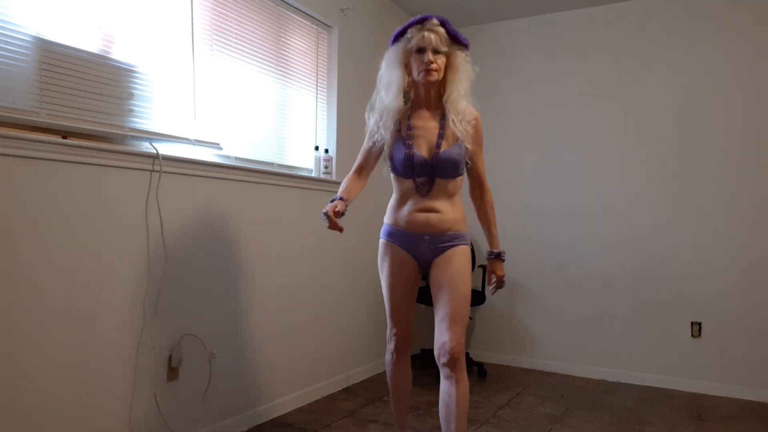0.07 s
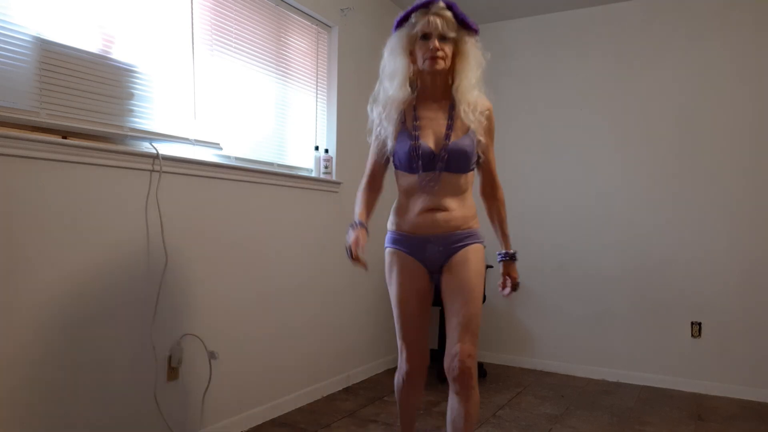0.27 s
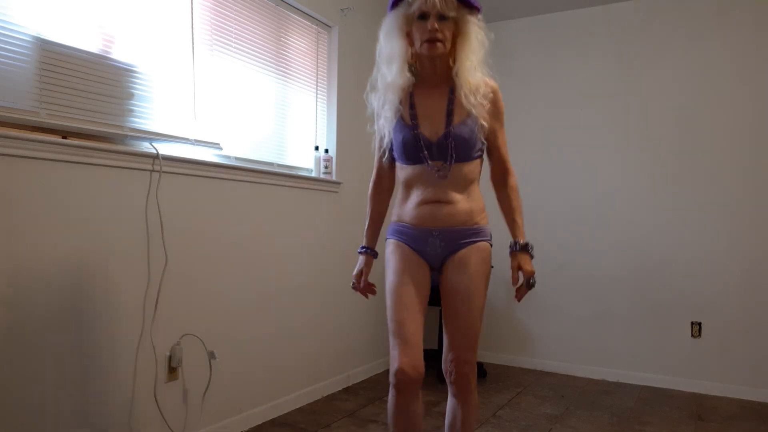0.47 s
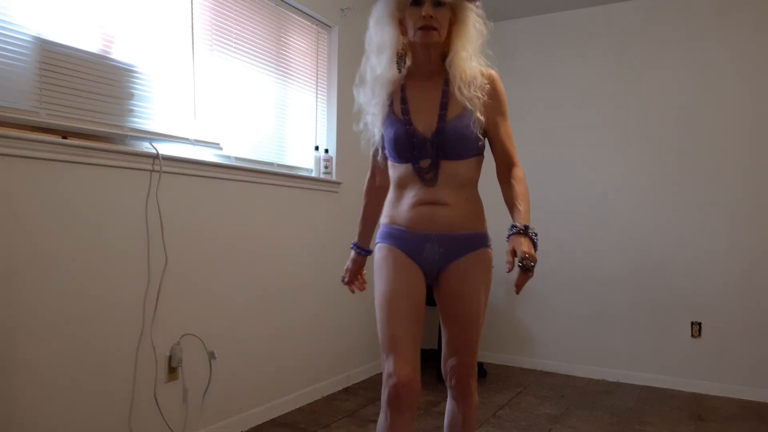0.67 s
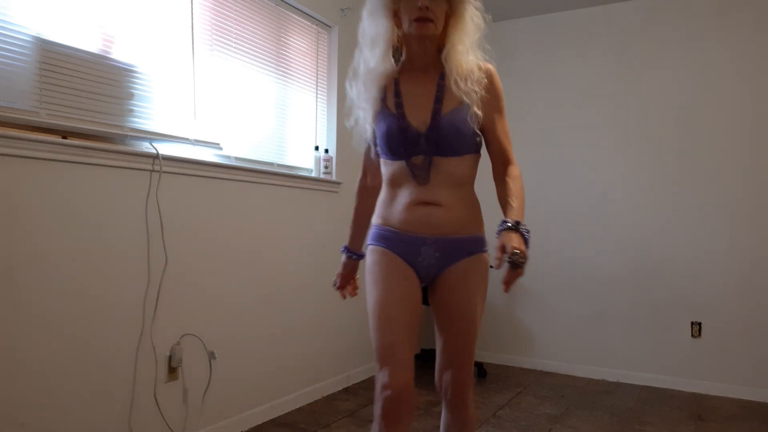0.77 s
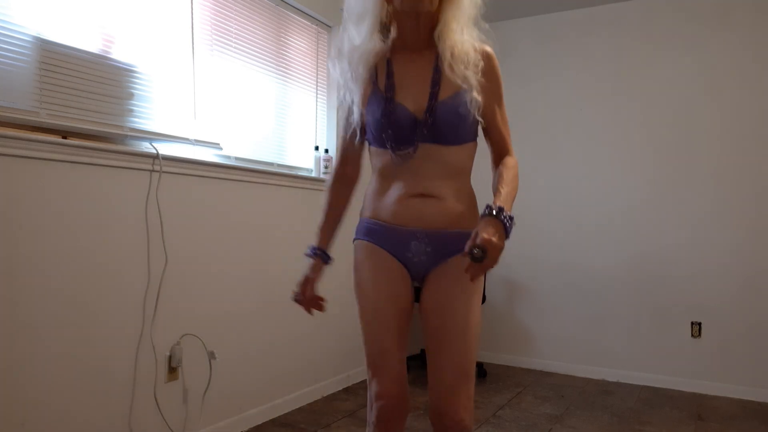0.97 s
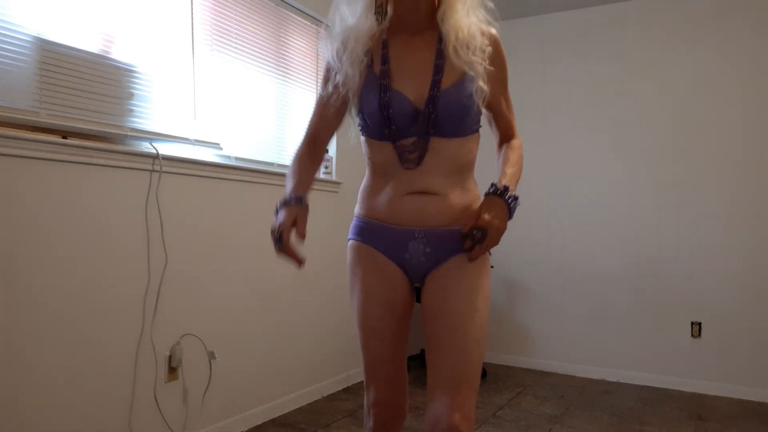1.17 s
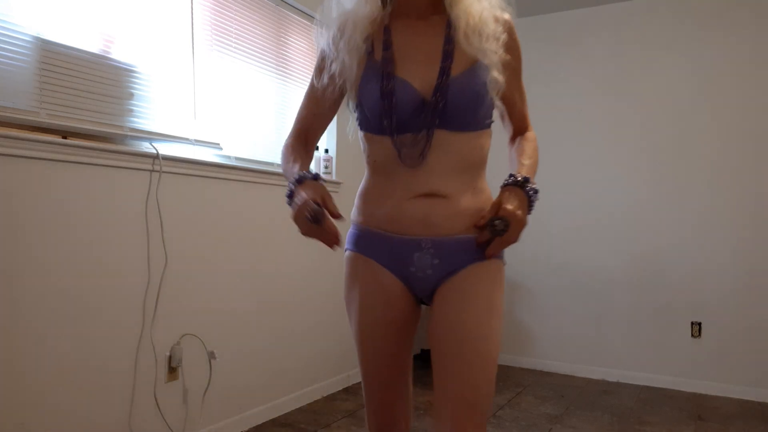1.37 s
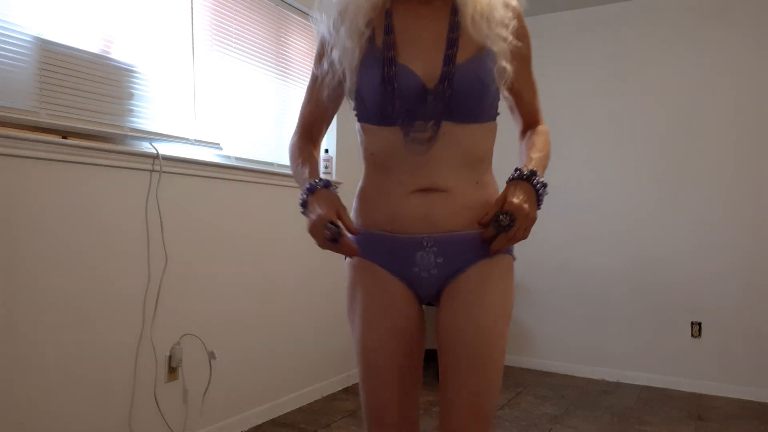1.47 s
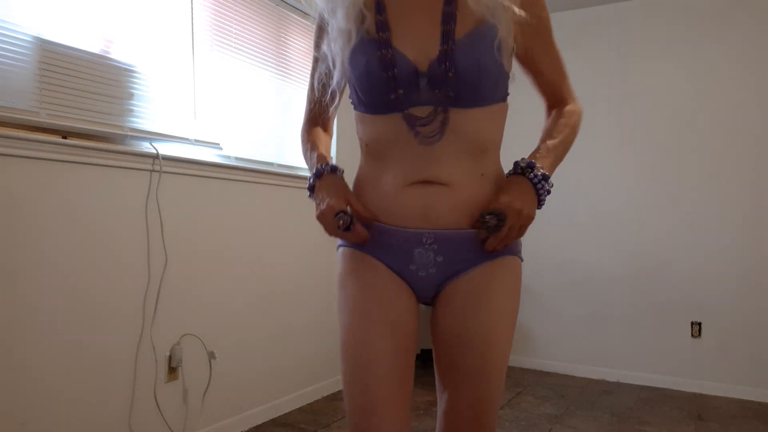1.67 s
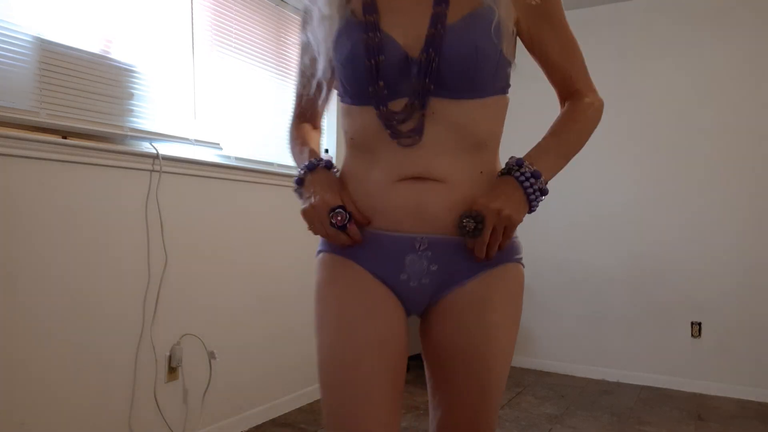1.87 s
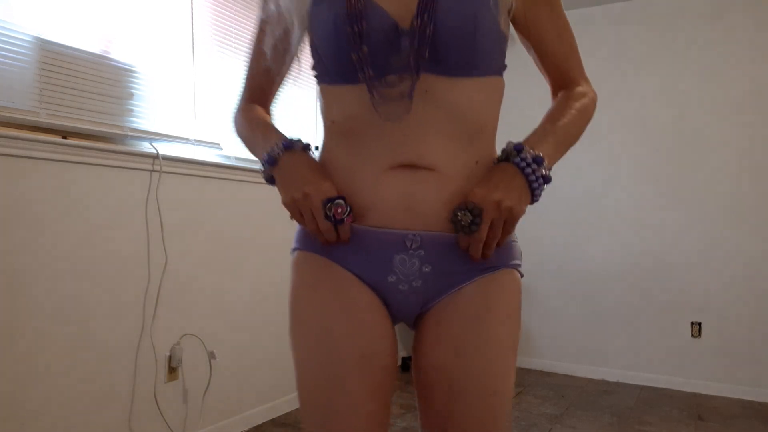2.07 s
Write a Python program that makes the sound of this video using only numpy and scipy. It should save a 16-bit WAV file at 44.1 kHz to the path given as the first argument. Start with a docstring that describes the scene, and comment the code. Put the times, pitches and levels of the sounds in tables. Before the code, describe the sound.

High-heeled shoes walk over hard tiles towards the microphone, heel and toe knocking in close pairs, with light scuffs and bead ticks; a bare room echoes each step over low hum and faint hiss.

```python
"""Someone in high heels walks towards the microphone over tiles in a bare, echoing room.
From the start heel and toe knock the floor (short bursts of ringing modes), soles scuff and beads tick
(bursts of noisy grains), and the walls smear it all (decaying noise as echoes).
Under it lie a low building hum (noise through narrow resonances) and a faint hiss (steady noise).
Later the hum swells twice on a steadier pitch."""
import sys
import numpy as np
from scipy import signal
from scipy.io import wavfile

SR = 44100
rng = np.random.default_rng(int(sys.argv[2]) if len(sys.argv) > 2 else 0)


def waveform_to_disk(signal):
    """Save audio, clipped to [-1, 1], as 16-bit WAV at the path in sys.argv[1]."""
    frames = np.transpose(np.atleast_2d(signal))
    scaled = np.clip(frames, -1, 1) * 32767
    samples = np.round(scaled).astype(np.int16)
    wavfile.write(sys.argv[1], SR, samples)


N = 92874   # length in samples
LEAD = 22050   # samples before the start, so that earlier sound is still ringing
DIRECT_DB = -17   # level of the sound that reaches the microphone without echoes
ROOM_BUILD_S = 0.012   # the echoes thicken over this time


def from_db(db):
    """Turn decibels into a factor on the wave."""
    return 10 ** (np.asarray(db) / 20)


def rms_one(x):
    """Scale a signal to an average (rms) level of 1."""
    return x / np.sqrt(np.mean(x ** 2) + 1e-20)


def at_hz(points, hz):
    """Read a curve of (f, value) points at any frequency, on a logarithmic frequency scale."""
    table = np.array(points)
    return np.interp(np.log(hz), np.log(table[:, 0]), table[:, 1])


def band(x, low_hz, high_hz):
    """Keep only the sound between two frequencies."""
    return signal.sosfilt(signal.butter(2, [low_hz, high_hz], "band", fs=SR, output="sos"), x)


def resonance(x, hz, width_hz):
    """A resonance favours one pitch; it has gain 1 at its top."""
    r = np.exp(-np.pi * width_hz / SR)
    feedback = [1, -2 * r * np.cos(2 * np.pi * hz / SR), r * r]
    return signal.lfilter(np.array([1, 0, -1]) * (1 - r * r) / 2, feedback, x)


def stereo_bands(size, count, gain):
    """Half-octave bands of stereo noise, each with its own gain and left-right likeness."""
    # how alike left and right are: (f/Hz, likeness from -1 opposite to 1 identical)
    likeness = [(60, 0.53), (130, 1), (290, 0.81), (640, 0.44), (1410, -0.4), (3100, 0.14), (6820, 0.35),
                (15000, 0.11)]
    out = 0
    edges = 28 * 2 ** np.arange(0, 9.6, .5)
    white = rng.standard_normal((2, 2, count, size))
    for k, (low, high) in enumerate(zip(edges, edges[1:])):
        centre = np.sqrt(low * high)
        mid, side = band(white[k % 2], low, high)
        alike = np.clip(at_hz(likeness, centre), -1, 1)
        left = np.sqrt(1 + alike) * mid + np.sqrt(1 - alike) * side
        right = np.sqrt(1 + alike) * mid - np.sqrt(1 - alike) * side
        out = out + gain(centre) * np.array([left, right])
    return out


def ring(clicks, modes, first):
    """Clicks set decaying modes ringing, neighbours in opposite phase; a unit click carries unit energy."""
    contact_s, contact_cycles = 0.0013, 1.5   # a mode swells over this time plus some of its own cycles
    t = np.arange(SR // 10) / SR
    body = 0
    for k, (hz, db, t60) in enumerate(modes):
        rise = np.sin(np.pi / 2 * np.clip(t / (contact_s + contact_cycles / hz), 0, 1)) ** 2
        decay = from_db(db - 60 * t / t60)
        body = body + (-1) ** (first + k) * decay * np.sin(2 * np.pi * hz * t) * rise
    body = body / np.sqrt(np.sum(body ** 2))
    return signal.fftconvolve(clicks, body[None])[:, :clicks.shape[1]]


def place(s):
    """Which of four spots along the walk sounds at a time."""
    return int(np.clip((s + .1) / .58, 0, 3))


def steps():
    """Every contact strikes the shoe's mode groups at its own strengths; the last row arrives directly."""
    # heel and toe contacts: (t/s, then level/dB of each group: thump, thud, body, knock, clack, tick)
    contacts = [(-.2, -49.5, -66, -53, -52.5, -60, -74.5), (0.109, -56, -70, -56, -69, -65, -66),
                (0.128, -56, -45, -54.5, -53, -57.5, -63), (.226, -47.5, -46, -44.5, -51.5, -58.5, -61),
                (.498, -63, -58, -54, -47.5, -55, -66), (0.722, -45.5, -45, -47, -40.5, -52, -55.5),
                (.798, -52, -53, -50, -55, -59.5, -64), (1.294, -48, -48.5, -53, -60, -63, -77),
                (1.335, -69, -60, -64, -60, -64, -71), (1.37, -58.5, -50, -51, -57.5, -66, -68.5),
                (1.44, -59.5, -78, -64.5, -67, -90, -103), (1.874, -56, -55, -74, -56.5, -65, -94),
                (1.882, -55.5, -52.5, -56, -51, -59.5, -70.5), (1.96, -57.5, -62.5, -59, -55, -62, -63)]
    # modes of the shoe on the tile, in groups from low to high: (f/Hz, level/dB, time to fall 60 dB/s)
    shoe_modes = [
        [(116.5, -5.5, 0.061), (185.8, 3, .035), (273, -1, 0.022)],
        [(369.4, -1, 0.023), (473.2, -5, 0.032)],
        [(624.5, 0.5, 0.015), (832, 3.5, 0.0075)],
        [(943, 5.5, .016), (1105, 1, 0.013)],
        [(1465, 0, 0.0061)],
        [(1994, -2.5, 0.0063), (2543, -2, 0.004)],
    ]
    toe_direct_db = 4.5   # the toe slap, soon after another contact, carries more directly
    heel_direct_db = -1.5   # other contacts arrive mostly by way of floor and walls
    clicks = np.zeros((len(shoe_modes), 5, LEAD + N))   # four spots, then the direct row
    last = -1
    for s, *db in contacts:
        at = LEAD + int(s * SR)
        direct_db = toe_direct_db if .03 < s - last < .11 else heel_direct_db
        clicks[:, place(s), at] = from_db(db)
        clicks[:, 4, at] = from_db(np.add(db, direct_db))
        last = s
    knocks, first = 0, 0
    for group_clicks, modes in zip(clicks, shoe_modes):
        knocks = knocks + ring(group_clicks, modes, first)
        first += len(modes)
    return knocks


def room(dry, direct):
    """The direct sound, then dense reflections dying band by band; each spot has its own echo pattern."""
    # how long the echoes last: (f/Hz, time to fall 60 dB/s)
    echo_times = [(100, 0.36), (400, 0.66), (1000, 0.74), (2500, .65), (6000, 0.67), (14000, 0.6)]
    t = np.arange(SR) / SR
    echoes = stereo_bands(SR, count=4, gain=lambda hz: from_db(-60 * t / at_hz(echo_times, hz)))
    echoes = echoes * (1 - np.exp(-t / ROOM_BUILD_S))
    wet = signal.fftconvolve(echoes, dry[None], axes=2).sum(axis=1)[:, LEAD:LEAD + N]
    return wet + np.sqrt(SR / 10) * from_db(DIRECT_DB) * direct[LEAD:]


def hum():
    """Low rumble in the room's first modes: noise through resonances, each wavering on its own."""
    # room modes: (f/Hz, width of the narrower of two filters/Hz, level before the waver/dB)
    room_modes = [(50, 24.6, -65.5), (77.8, 42, -69), (113.6, 26.2, -65), (140.6, 11.3, -71),
                  (180, 90, -81.5)]
    waver_db, waver_per_s = -4.5, 3.7   # typical size, and new random levels per second
    out = 0
    for hz, width_hz, db in room_modes:
        waver = np.interp(np.arange(N) * waver_per_s / SR, np.arange(30), rng.standard_normal(30))
        noise = rng.standard_normal(LEAD + N)
        tone = resonance(resonance(noise, hz, width_hz), hz, 2 * width_hz)[LEAD:]
        out = out + from_db(db + waver_db * waver) * rms_one(tone)
    return out


def air():
    """Steady faint hiss of room and microphone: noise shaped band by band."""
    # colour of the hiss: (f/Hz, relative level per Hz/dB)
    colour = [(30, -11.5), (60, -2), (150, -13), (260, -14), (600, -20.5), (1100, -26), (1900, -25.5),
              (3200, -34), (6000, -35), (9000, -54), (12000, -39), (15500, -22)]
    level_db = -73.5
    hiss = stereo_bands(LEAD + N, count=1, gain=lambda hz: from_db(at_hz(colour, hz)))[:, 0, LEAD:]
    return from_db(level_db) * rms_one(hiss)


def scuffs():
    """Soles and beads: uneven grains under short swells, in three bands; the room returns a dying hiss."""
    # scuffs of the soles and rattle of beads:
    # (t/s, length/s, coarse level/dB, gritty level/dB, fine level/dB, nearness/dB)
    rubs = [(-.02, 0.055, -89, -90, -87, -4), (0.059, 0.037, -93, -78.5, -62, -8),
            (0.104, 0.082, -62, -63, -64.5, -9), (0.229, 0.013, -52, -59, -49.5, -15),
            (0.484, 0.034, -70.5, -81, -75.5, -2), (0.625, 0.019, -75, -72, -67, -6),
            (0.696, 0.18, -62.5, -64, -63, -18), (0.803, 0.064, -87, -70.5, -65.5, 3),
            (1.201, 0.025, -87, -85, -70, -3), (1.235, 0.007, -92, -92, -72, 11),
            (1.286, 0.069, -75.5, -74.5, -68, 1), (1.35, 0.029, -69.5, -71, -68, -15),
            (1.364, 0.082, -64, -63.5, -60, 4.5), (1.607, 0.092, -85.5, -90, -79, 8),
            (1.799, 0.076, -81, -82, -72.5, 0.5), (1.873, .05, -79, -75.5, -74, 2.5),
            (1.947, 0.024, -67.5, -69.5, -67.5, -12), (2.002, 0.044, -71, -68.5, -62.5, 0.1)]
    # time for the echoes to fall 60 dB: (coarse/s, gritty/s, fine/s)
    tail_times = (0.56, 0.67, .42)
    bands = (2870, 4860), (4490, 7500), (10700, 15900)   # coarse, gritty, fine (Hz)
    grit_per_s, grit_spread_db, rise_s = 6000, 1, 0.00067
    t = np.arange(N) / SR
    hits = rng.random(N) < grit_per_s / SR
    sizes = from_db(grit_spread_db * np.minimum(rng.exponential(1, N), 3))
    grains = hits * sizes * rng.choice([-1, 1], N)
    colours = np.array([rms_one(band(grains, *hz)) for hz in bands])
    power, out = 0, 0
    for s, length, *db, near_db in rubs:
        rise = np.clip((t - s) / rise_s, 0, 1)
        fall = np.clip(1 - (t - s) / max(length, .003), 0, 1) ** .5
        swell = rise * fall
        swell = swell / np.sqrt(np.sum(swell ** 2))
        power = power + np.outer(from_db(db), swell) ** 2
        out = out + np.sqrt(SR / 10) * from_db(DIRECT_DB + near_db) * swell * (from_db(db) @ colours)
    # the echoes are ever new, so only their energy follows the scuffs
    for energy, hz, t60 in zip(power, bands, tail_times):
        tail = (from_db(-60 * t / t60) * (1 - np.exp(-t / ROOM_BUILD_S))) ** 2
        loudness = np.sqrt(np.abs(signal.fftconvolve(energy, tail)[:N]))
        out = out + loudness * rms_one(band(rng.standard_normal((2, N)), *hz))
    return out


def hum_swells():
    """A low, slightly wandering tone that comes and goes: noise through two narrow resonances."""
    # swells of the hum on a steadier pitch: (t/s, length/s, f/Hz, level at the top of the swell/dB)
    swells = [(0.804, 0.46, 121.5, -60.5), (1.637, 0.4, 137.6, -60)]
    out, t = 0, np.arange(N) / SR
    for s, length, hz, db in swells:
        noise = rng.standard_normal(LEAD + N)
        tone = rms_one(resonance(resonance(noise, hz, 4.8), hz, 12.0)[LEAD:])
        swell = np.sin(np.pi * np.clip((t - s) / length, 0, 1)) ** .5
        out = out + from_db(db) * swell * tone
    return out


def scene():
    """Add up all the sounds and set the balance of left and right."""
    left_db = -2   # left compared with right
    knocks = steps()
    mix = room(knocks[:4], knocks[4]) + scuffs() + hum() + hum_swells() + air()
    return mix * from_db([[left_db / 2], [-left_db / 2]])


def record(dry):
    """The microphone drops the deep bass and has a dip in the treble; the top is cut."""
    bass_cut_hz, cutoff_hz = 36, 15900
    dip_hz, dip_width_hz, dip_share = 8900, 1100, 0.5   # share of the sound taken away at the dip
    dry = signal.sosfilt(signal.butter(4, bass_cut_hz, "high", fs=SR, output="sos"), dry)
    dipped = dry - dip_share * resonance(dry, dip_hz, dip_width_hz)
    return signal.sosfilt(signal.cheby2(24, 60, cutoff_hz, fs=SR, output="sos"), dipped)


dry = scene()
out = record(dry)
waveform_to_disk(out)
```